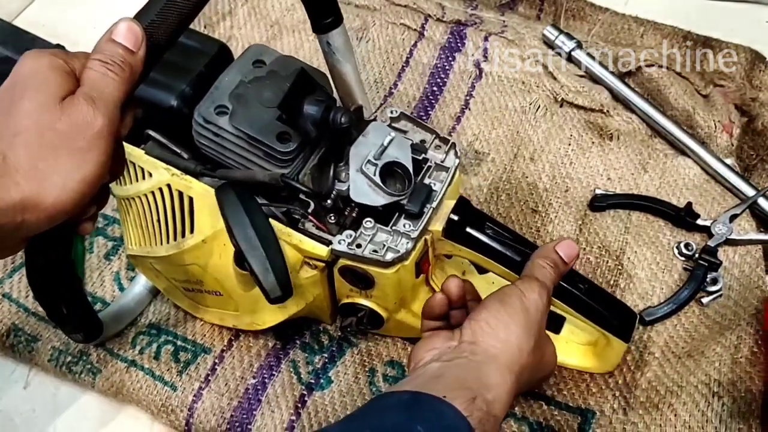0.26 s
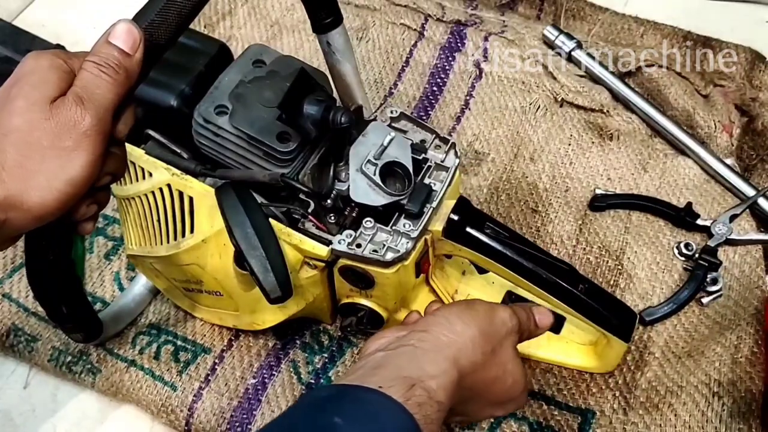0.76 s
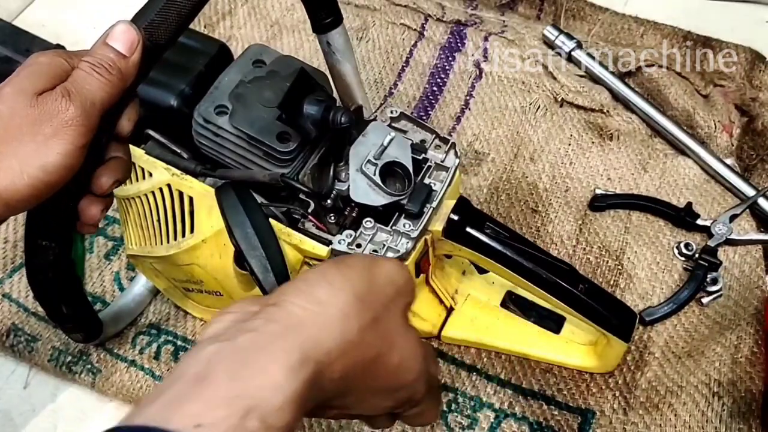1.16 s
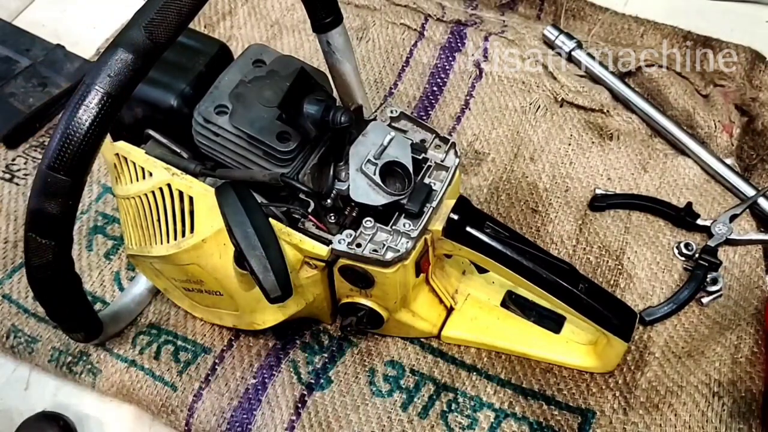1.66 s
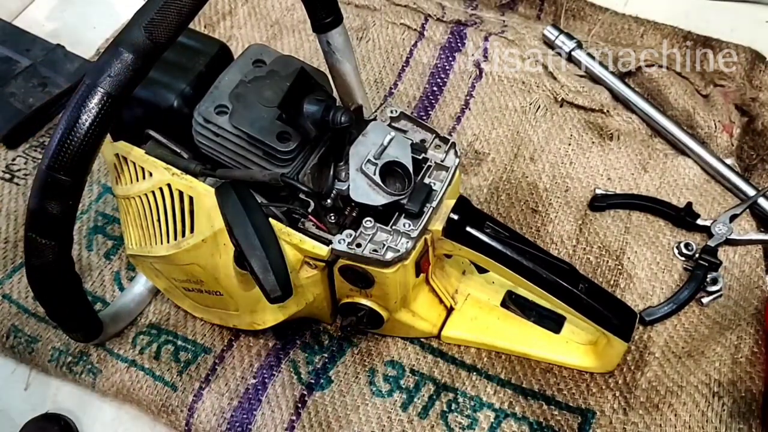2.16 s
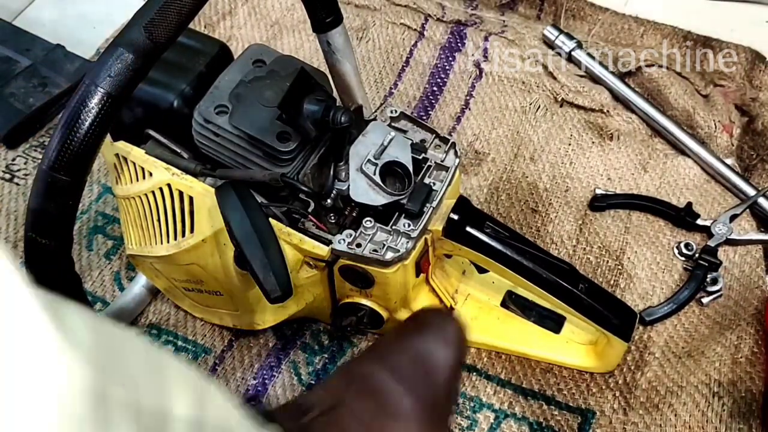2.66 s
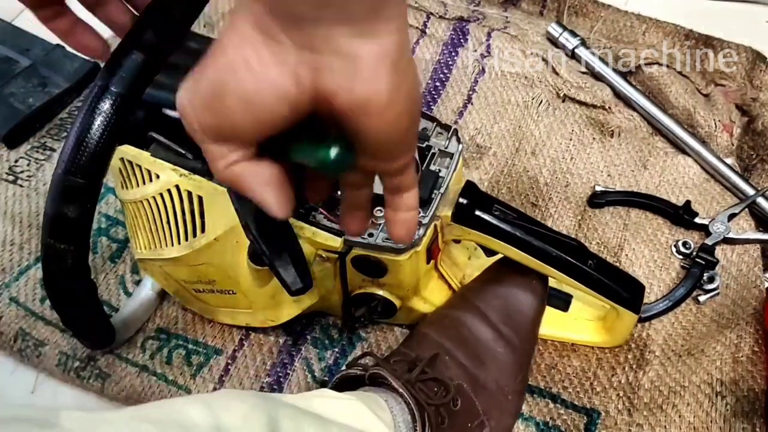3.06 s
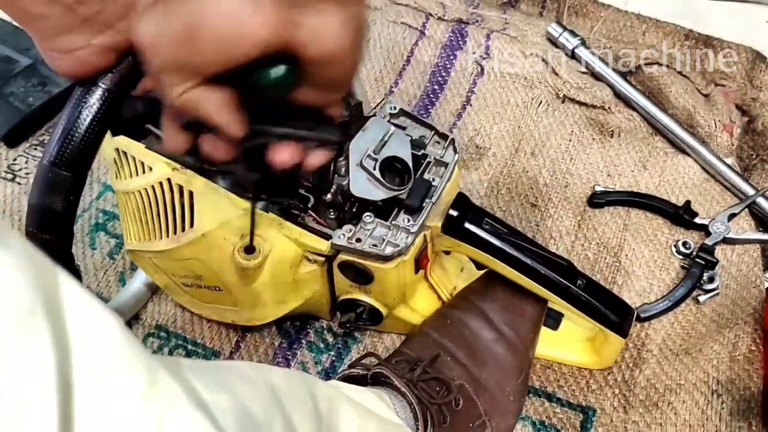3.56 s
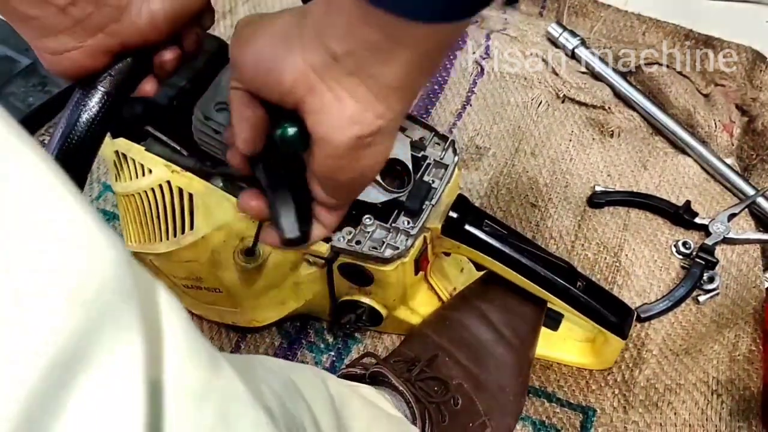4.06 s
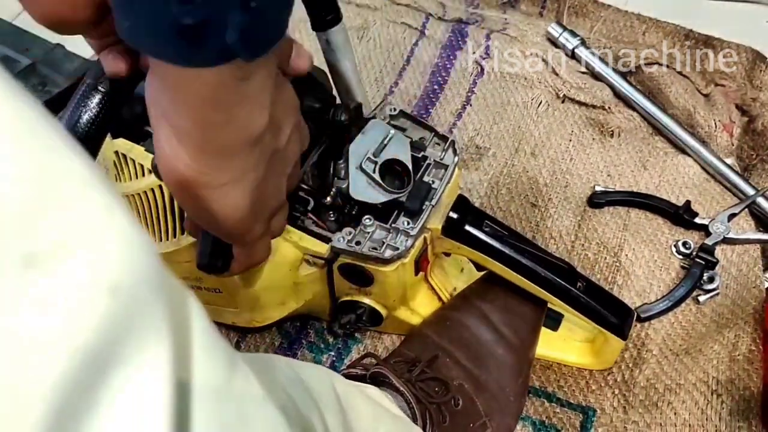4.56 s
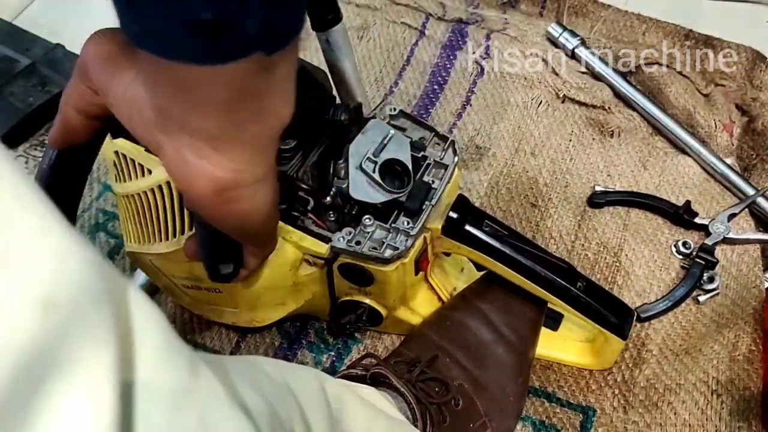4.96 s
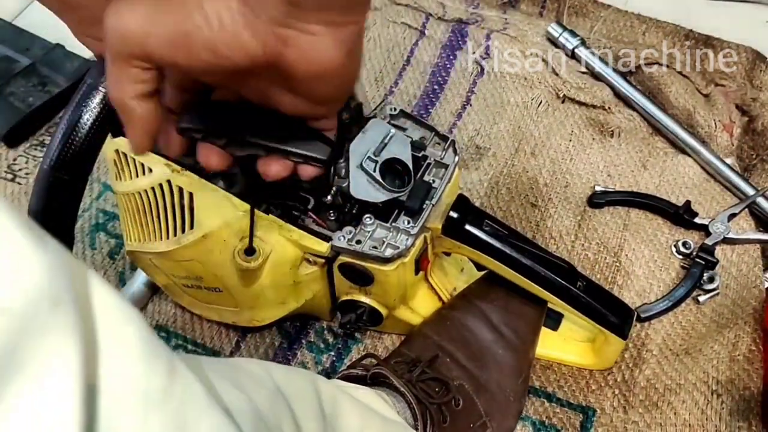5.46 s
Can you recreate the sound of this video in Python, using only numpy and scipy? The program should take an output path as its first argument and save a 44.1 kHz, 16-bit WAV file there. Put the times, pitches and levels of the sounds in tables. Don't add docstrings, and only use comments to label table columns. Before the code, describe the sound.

A small two-stroke chainsaw engine stumbles, labours and stalls close by, then near-quiet with a faint distant grinder, plastic knocks, cloth rustles and a far squeal.

```python
import sys
import numpy as np
from scipy import signal
from scipy.fft import rfft, irfft
from scipy.io import wavfile
from scipy.ndimage import uniform_filter1d

SR = 44100
rng = np.random.default_rng(int(sys.argv[2]) if len(sys.argv) > 2 else 0)


def undo_db(level):
    steps = np.asarray(level, float) / 20
    return 10 ** steps


def pcm_store(signal):
    levels = np.round(np.clip(np.atleast_2d(signal), -1, 1) * 32767)
    wavfile.write(sys.argv[1], SR, levels.astype(np.int16).T)


N = 251370
T = np.arange(N) / SR


def evened(x):
    return x / np.sqrt(np.mean(x ** 2) + 1e-20)


def read(points, hz):
    f, value = np.transpose(points)
    return np.interp(np.log(hz + 1), np.log(f + 1), value)


def highpass(x, hz):
    return signal.sosfilt(signal.butter(3, hz, "high", fs=SR, output="sos"), x)


def resonate(x, hz, width):
    r = np.exp(-np.pi * width / SR)
    pole = r * np.exp(2j * np.pi * hz / SR)
    return 2 * signal.lfilter([1 - r], [1, -pole], x + 0j).real


# (frequency [Hz], correlation [-1 to 1])
LIKENESS = [(60, 0.062), (180, 0.6), (550, 0.78), (1650, 0.28), (4970, -0.21), (15000, 0.26)]


def noise(spectrum, peaks=(), patchy_db=2, flicker_db=1):
    frames, hz = N // 128 + 5, np.fft.rfftfreq(512, 1 / SR)
    a, b, c, d, patches = rng.standard_normal((frames, 257, 5)).T
    patches = uniform_filter1d(patches, size=5, axis=0)
    patches = evened(uniform_filter1d(patches, size=14, axis=1))
    flicker = evened(uniform_filter1d(rng.standard_normal(frames), size=4))
    same = np.clip(read(LIKENESS, hz), -1, 1)[:, None]
    left, other = a + 1j * b, c + 1j * d
    right = same * left + np.sqrt(1 - same ** 2) * other
    z = np.array([left, right]) * undo_db(patchy_db * patches + flicker_db * flicker)
    x = signal.istft(z, nperseg=512, noverlap=384)[1][:, :N]
    hz = np.fft.rfftfreq(N, 1 / SR)
    ridges = 1 + sum(undo_db(db) / (1 + (2 * (hz - f) / w) ** 2) for f, w, db in peaks)
    return evened(irfft(rfft(x) * undo_db(read(spectrum, hz)) * ridges, N))


def white():
    return noise([(20, 0), (20000, 0)])


def whine(air, hz, width):
    x = resonate(resonate(air, hz, width), hz, 2 * width)
    slow_level = uniform_filter1d(abs(x), size=1500, axis=1)
    return evened(x / (slow_level + .3 * x.std()))


def swell(s, hold_s, db, rise, fall, sag=0):
    to_come = np.maximum(s - T, 0)
    held = np.clip(T - s, 0, hold_s)
    past = np.maximum(T - s - hold_s, 0)
    return undo_db(db - rise * to_come - sag * held - fall * past)


def joined(gains):
    return np.sqrt(sum(g ** 2 for g in gains))


def crank_strokes(turns, speed, lag, spread_db):
    at = np.flatnonzero(np.diff(np.floor(turns - lag)))
    uneven = undo_db(spread_db * rng.standard_normal(400)[:len(at)])
    x = np.zeros(N)
    np.add.at(x, (at / SR * SR).astype(int), uneven / np.sqrt(speed[at]))
    return x


def rung(drive, air, modes, rough):
    clean = 0
    for k, (f, w, db) in enumerate(modes):
        clean = clean + (-1) ** k * undo_db(db) / w * resonate(resonate(drive, f, w), f, 2.1 * w)
    blurred = sum(undo_db(db) * resonate(resonate(air, f, w), f, 3 * w) for f, w, db in modes)
    return clean / clean[T < .75].std() + rough * evened(blurred)


# (time [s], speed [turns/s])
CRANK_SPEED = [
    (0.0, 87.85),
    (0.16, 52.4),
    (0.24, 43.8),
    (0.29, 54.5),
    (0.37, 56.0),
    (0.54, 49.4),
    (0.66, 31.1),
    (0.72, 19.1),
    (0.8, 16.5),
]
# (time [s], burn strength level [dB], labouring level [dB])
BURN = [
    (0, -0.5, 1.5),
    (.145, -6, 0),
    (.214, -34.5, -1),
    (.25, -19.5, -3),
    (.344, -12, 1.5),
    (.53, -18, 0),
    (.572, -10.5, 10.5),
    (.692, -21.5, 3),
    (.77, -31, 7.5),
]
# (frequency [Hz], width [Hz], level [dB])
BOOM_MODES = [(113, 70, -8.5), (163.5, 39, -2), (245, 70, 0)]
# (frequency [Hz], width [Hz], level [dB])
CASE_MODES = [(316.5, 48.7, 4), (386, 93, 0), (482.3, 30, -4), (550, 100, -1.5), (650, 88, -3)]
# (frequency [Hz], width [Hz], level [dB])
SILENCER_MODES = [(680.6, 83, -6.5), (847, 140, 15), (1030, 130, -4), (1040, 120, -8.5)]
# (frequency [Hz], density [dB per Hz])
RATTLE_SPECTRUM = [(650, -29.5), (1100, -11.5), (1390, -15), (1710, -9.5), (1870, -8), (3020, -6),
                   (3520, -10.5), (4250, -10.5), (5670, -7), (7000, -5.5), (8550, -11.5), (13900, -15),
                   (15600, -21)]
# (frequency [Hz], width [Hz], level [dB])
FIN_MODES = [(1880, 50, 4), (2310, 36, 4), (4090, 180, 3), (6850, 280, -11), (7700, 150, -6.5)]
# (full-burn level [dB], slope [dB per dB of burn], slope [dB per dB of labour])
SAW_LAYERS = [
    (-18, .2, .25),
    (-24, -.22, .1),
    (-11.5, 1.14, 0.3),
    (-22, 0.19, 0.26),
]


def engine():
    speed = np.interp(T, *np.transpose(CRANK_SPEED))
    turns = -.2 + np.cumsum(speed) / SR
    time_s, burn, labour = np.transpose(BURN)
    burn_db, labour_db = np.interp(T, time_s, burn), np.interp(T, time_s, labour)

    blow, air = crank_strokes(turns, speed, 0, 1.2), white()
    gulp = crank_strokes(turns, speed, .2, 1.6) * .7 + crank_strokes(turns, speed, .6, 1.6) * .5
    boom = rung(blow, air, BOOM_MODES, .18)
    thump = rung(blow + gulp, air, CASE_MODES, .33)
    thump = thump * np.minimum(speed / 27, 1) ** 1.9
    ring = rung(blow, air, SILENCER_MODES, .3)

    puff_depth_db = 4 + labour_db
    since_port_s = ((turns - .53) % 1) / speed
    puff = np.exp(-since_port_s / 0.0036) + 0.13 * np.exp(-(turns % 1) / .1)
    rattle = noise(RATTLE_SPECTRUM, FIN_MODES, patchy_db=1.0, flicker_db=1.55)
    rattle = rattle * undo_db(puff_depth_db * (1.3 * puff - 0.3043))

    running = 0
    for x, (db, per_burn, per_labour) in zip((boom, thump, ring, rattle), SAW_LAYERS):
        running = running + x * undo_db(db + per_burn * burn_db + per_labour * labour_db)
    stall_s, stall_db_per_s = 0.769, 481
    return running * undo_db(-stall_db_per_s * np.maximum(T - stall_s, 0))


# (time [s], hiss level [dB], thump level [dB], t60 [s])
PISTON_KICKS = [
    (0.695, -22, -37, 0.04),
    (0.7105, -25, -39, 0.051),
    (0.722, -12, -25, 0.052),
    (0.767, -16, -11.5, 0.19),
    (0.867, -42, -23.5, 0.11),
    (0.883, -25, -30, 0.068),
    (0.907, -25, -18, 0.093),
    (.92, -43, -20.5, 0.12),
    (0.952, -43.5, -31.5, 0.11),
]
# (time [s], level [dB])
BELL_STRIKES = [
    (.677, -28),
    (.7125, -23),
    (.72, -16),
    (.738, -23),
    (.752, -25),
    (.768, -27),
    (.8835, -26),
    (.895, -31),
]
# (frequency [Hz], level [dB], t60 [s])
BELL_MODES = [(7390, -1, .11), (7520, -2, .08), (7640, 0, .14)]


def kicks():
    out, hiss, t = np.zeros((2, N)), noise(RATTLE_SPECTRUM), T[:SR // 4]
    push = 0
    for f, w, db in BOOM_MODES[1:] + CASE_MODES[:2]:
        push = push + undo_db(db) * np.exp(-np.pi * 1.2 * w * t) * np.sin(2 * np.pi * f * t)
    push = push * (1 - np.exp(-t / 0.0034))
    for s, hiss_db, thump_db, t60 in PISTON_KICKS:
        at = round(s * SR)
        burst = hiss[:, at:at + len(t)] * undo_db(-60 * t / t60) * (1 - np.exp(-t / 0.001))
        out[:, at:at + len(t)] += undo_db(hiss_db) * burst + undo_db(thump_db) * push
    for s, db in BELL_STRIKES:
        at, phases = round(s * SR), rng.random((3, 2, 1)) * 2 * np.pi
        bell = 0
        for (f, mode_db, t60), phase in zip(BELL_MODES, phases):
            bell = bell + undo_db(mode_db - 60 * t / t60) * np.sin(2 * np.pi * f * t + phase)
        out[:, at:at + len(t)] += undo_db(db) * bell
    return out


# (time [s], level [dB])
GRINDER_LEVEL = [
    (.8, -89),
    (.94, -57),
    (1.1, -62),
    (1.42, -62),
    (1.82, -56.5),
    (2.1, -57.5),
    (2.42, -56.5),
]
# (frequency [Hz], density [dB per Hz])
CUTTING_SPECTRUM = [(120, -40), (200, -40), (290, -26.5), (576, -3.5), (763, -14.5), (2240, -10),
                    (4770, -14), (5400, -14), (6330, -10), (8100, -11.5), (9660, -15.5), (11300, -22.5),
                    (13500, -22)]
# (frequency [Hz], width [Hz], level [dB])
DISC_MODES = [(590, 140, -2.5), (2300, 23, 4), (3300, 90, 2), (4780, 230, 5.5), (6180, 100, 4),
              (6450, 70, 5), (7440, 440, -0.5), (8240, 120, 10)]
# (frequency [Hz], density [dB per Hz])
FREE_SPECTRUM = [(180, -42), (300, -9.5), (600, -4.5), (809, -15), (1130, -0.5), (1440, -52), (1750, -1),
                 (3000, -28), (3900, -47), (6600, -120)]
# (frequency [Hz], width [Hz], level [dB])
GEAR_MODES = [(560, 110, 7), (1000, 90, 7), (1150, 90, 7), (1750, 300, 3), (2290, 90, 16)]


def grinder():
    lift_s, hush_s = 2.42, 3.437
    whistle_hz, width_hz = 14550, 300
    rim = resonate(white(), whistle_hz, width_hz)
    rim = evened(resonate(rim, whistle_hz, width_hz))
    cutting = noise(CUTTING_SPECTRUM, DISC_MODES, patchy_db=2.5, flicker_db=0.66)
    cutting = cutting + undo_db(-6.5 - 13.5) * rim
    free = noise(FREE_SPECTRUM, GEAR_MODES, patchy_db=1.5, flicker_db=-1.0)
    free = free * np.clip((T - lift_s) / 0.025, 0, 1)
    off = np.maximum(T - lift_s, 0)
    lift_drop_db = 14 * (1 - np.exp(-off / 0.045))
    rundown_db = 11.5 * off
    cut_db = np.interp(T, *np.transpose(GRINDER_LEVEL)) - lift_drop_db - rundown_db
    sag_db = 7.5 * np.sin(np.pi * np.minimum(off / 1.5, 1))
    throb_db = off * np.cos(2 * np.pi * 8 * (T - hush_s))
    whirr_db = -61 - sag_db + throb_db
    return (cutting * undo_db(cut_db + 18.5) + free * undo_db(whirr_db + 7.0)) * (T < hush_s)


# (time [s], hold [s], dull rub level [dB], bright rustle level [dB], fall [dB/s])
HAND_STROKES = [
    (3.6, 0.46, -88, -65.5, 210),
    (4.172, .11, -51, -52, 400),
    (4.338, 0.069, -63, -63, 148),
    (4.391, 0, -58.5, -48, 126),
    (4.687, 0, -57, -53, 217),
    (4.791, .04, -66, -60, 150),
]
# (time [s], hold [s], dull rub level [dB], bright rustle level [dB], fall [dB/s])
JOLTED_SCUFFS = [
    (3.464, 0, -40, -44, 180),
    (3.854, 0.035, -61, -65.5, 120),
    (4.496, 0, -33, -51, 410),
    (4.593, 0.0049, -40, -38.5, 258),
]
# (frequency [Hz], density [dB per Hz])
RUB_SPECTRUM = [(210, -45), (350, -38), (575, 0), (672, -6.5), (766, -1.5), (1110, -2), (2800, -9),
                (3640, -37), (6160, -120)]
# (frequency [Hz], density [dB per Hz])
RUSTLE_SPECTRUM = [(1470, -12), (2500, -9.5), (3440, -2.5), (5010, -3), (6150, -1), (6950, 3.5),
                   (9510, -7.5), (13800, -11.5), (15500, -17.5)]


def hands():
    rows = [(620, *row) for row in HAND_STROKES] + [(6000, *row) for row in JOLTED_SCUFFS]
    rub = joined(swell(s, hold, db, rise, fall, sag=60) for rise, s, hold, db, _, fall in rows)
    rustle = joined(swell(s, hold, db, rise, fall * .75) for rise, s, hold, _, db, fall in rows)
    dull = noise(RUB_SPECTRUM, patchy_db=4.5, flicker_db=3.0)
    bright = noise(RUSTLE_SPECTRUM, patchy_db=-1.0, flicker_db=0.6)
    return dull * rub * 0.84 + bright * rustle * 0.75


# (time [s], crack level [dB], ring [Hz], ring level [dB], t60 [s])
HANDLE_KNOCKS = [(3.439, -32, 1060, -3.5, 0.053), (3.46, -13, 1190, -8, 0.021),
                 (3.513, -26.5, 2280, -10, 0.022), (3.562, -49, 366, 12.5, 0.034),
                 (3.851, -60, 707, 2, 0.072), (3.875, -59, 1340, 9, 0.046), (4.17, -66.5, 590, 5, 0.064),
                 (4.225, -49.5, 754, -21, 0.17), (4.282, -48.5, 570, -15, 0.067),
                 (4.323, -58, 1780, 5, 0.034), (4.4937, -29, 1203, 3, 0.03), (4.5, -49, 650, 10, 0.09),
                 (4.592, -38.5, 1313, -6, 0.092), (5.69, -57, 2170, -4, 0.028)]
# (frequency [multiple of ring], level [dB])
PLASTIC_MODES = [(0.522, -3.5), (0.698, -8), (1.002, 4.5), (1.35, 0.5), (1.698, -1.5), (2.9, -25)]


def knocks():
    out, crack, t = np.zeros((2, N + SR)), noise(RUSTLE_SPECTRUM), T[:SR // 5]
    attack = 1 - np.exp(-t / 0.0007)
    pan = undo_db(np.array([[.5], [-.5]]) * 3.5)
    for s, db, hz, ring_db, t60 in HANDLE_KNOCKS:
        at = round(s * SR)
        body = sum(undo_db(d) * np.sin(2 * np.pi * k * hz * t) for k, d in PLASTIC_MODES)
        body = body * undo_db(ring_db - 60 * t / t60)
        tick = crack[:, at // 2:at // 2 + len(t)] * undo_db(-60 * t / (.5 * t60))
        out[:, at:at + len(t)] += undo_db(db) * (0.67 * body + 1.85 * tick) * attack * pan
    return highpass(out[:, :N], 300)


# (frequency [Hz], width [Hz], time [s], hold [s], level [dB])
FAR_TONES = [(427, 15, 3.01, .05, -50.5), (414, 18, 3.125, .09, -53), (650, 73, 3.365, 0, -53.5),
             (3440, 18, 3.62, .05, -70), (3442, 25, 3.76, .38, -71.5), (752, 64, 4.784, .36, -61),
             (917, 27, 4.83, 0.27, -62.5), (1450, 45, 4.84, .28, -75), (4500, 210, 4.922, .1, -77),
             (7000, 900, 5.06, .07, -81), (8070, 21, 5.515, .015, -47), (8030, 18, 5.55, .1, -58)]
# (time [s], hold [s], level [dB], rise [dB/s], fall [dB/s])
WHEEL_SQUEAL = (5.56, .125, -52.5, 750, 380)
# (frequency [Hz], width [Hz], level [dB])
WHEEL_LINES = [(791, 50, -14), (1900, 40, -12), (2100, 18, 1), (2250, 60, -18), (2790, 60, -13),
               (4200, 28, -6), (5900, 90, -16), (6300, 45, -6), (7210, 80, -15), (8900, 70, -18),
               (10500, 150, -20), (11600, 120, -23), (12600, 120, -23)]


def far_machines():
    air, tones = white(), 0
    for f, w, s, hold, db in FAR_TONES:
        tones = tones + whine(air, f, w) * swell(s, hold, db, rise=420, fall=260, sag=14)
    wheel = sum(undo_db(db) * whine(air, f, w) for f, w, db in WHEEL_LINES)
    return tones + (wheel + .16 * noise(RUSTLE_SPECTRUM)) * swell(*WHEEL_SQUEAL)


# (time [s], hold [s], level [dB])
RUMBLE_SWELLS = [(1.02, 0, -50.5), (1.79, 0.059, -73), (2.02, 0.29, -66.5), (2.45, 0, -55),
                 (2.657, 0.35, -66.5), (3.145, 0.13, -71), (3.462, 0.017, -44.5), (3.57, 0.019, -54),
                 (3.94, 0, -68), (4.196, 0.053, -78), (4.51, 0, -71), (4.64, 0, -73), (4.808, 0.092, -73),
                 (5.105, 0.0013, -67), (5.285, 0.0076, -70), (5.45, 0.33, -75)]
# (frequency [Hz], density [dB per Hz])
RUMBLE_SPECTRUM = [(50, -24.5), (100, -8), (160, 0), (300, -1.5), (420, -21), (900, -64)]


def background():
    swells = joined(swell(*row, rise=377, fall=239, sag=25) for row in RUMBLE_SWELLS)
    return noise(RUMBLE_SPECTRUM, patchy_db=3., flicker_db=0.0) * (swells + undo_db(-91.5))


# (frequency [Hz], t60 [s])
ROOM_DECAY = [(100, 0.33), (1000, .45), (4000, .35), (15000, 0.066)]


def workshop(x):
    taps = np.zeros((2, SR // 2))
    grid = np.arange(200, SR // 2 - 20, 20)
    at = grid + rng.integers(0, 20, (2, len(grid)))
    np.put_along_axis(taps, at, rng.choice([-1., 1.], at.shape), 1)
    hz, t, z = signal.stft(taps, SR, nperseg=256)
    decay = undo_db(-60 * t / read(ROOM_DECAY, hz)[:, None])
    tail = signal.istft(z * decay, SR, nperseg=256)[1]
    bass = uniform_filter1d(tail, size=70, axis=1)
    tail = tail - 0.81 * (bass - bass[0])
    return signal.fftconvolve(x.mean(0)[None], tail / np.linalg.norm(tail[0]), axes=1)[:, :N]


# (frequency [Hz], level re mean of the moment [dB])
WEAKEST_KEPT = [(1500, -9), (2700, -6.5), (3800, -8), (5400, -4), (7000, -8), (8600, -11), (10500, -7),
                (13000, -9), (13900, -6), (14500, -9), (15000, -8), (15400, -2), (15700, 5)]


def starved(x):
    hz, _, z = signal.stft(x, SR, nperseg=1024)
    power = uniform_filter1d((abs(z) ** 2).mean(0), size=7, axis=0)
    power = uniform_filter1d(power, size=4, axis=1)
    band_db = 10 * np.log10(abs(power) + 1e-20)
    mean_db = band_db[(hz > 1500) & (hz < 15000)].mean(0)
    strong = band_db > mean_db + read(WEAKEST_KEPT, hz)[:, None]
    keep = strong | (hz < 1200)[:, None]
    return signal.istft(z * keep, SR, nperseg=1024)[1][:, :N]


# (frequency [Hz], density [dB per Hz])
AIR_SPECTRUM = [(18, -43), (30, -13), (108, 2), (237, -6), (300, -5), (400, -16), (640, -23), (2690, -31),
                (15500, -41)]


def microphone_air():
    return undo_db(-81) * noise(AIR_SPECTRUM, flicker_db=-0.5)


def scene():
    saw, blows = engine() + kicks(), knocks()
    near = saw + blows + workshop(undo_db(-8) * saw + undo_db(-7.5) * blows)
    return near + grinder() + hands() + far_machines() + background()


def roll_off(x):
    return signal.sosfilt(signal.butter(12, 15710, fs=SR, output="sos"), x)


def record(dry):
    limited = .9 * np.tanh(highpass(dry, 62) / .9)
    mix = starved(limited) + microphone_air()
    return roll_off(mix)


dry = scene()
out = record(dry)
pcm_store(out)
```